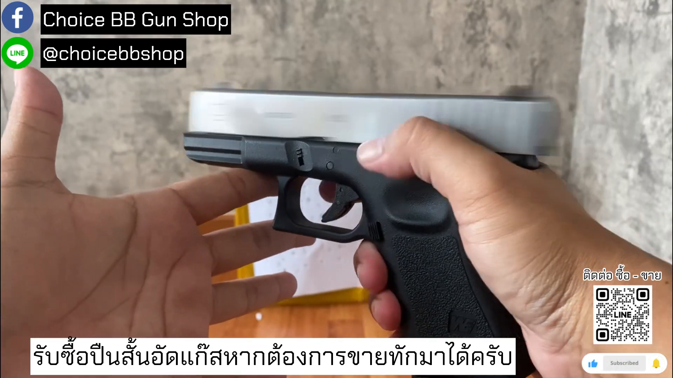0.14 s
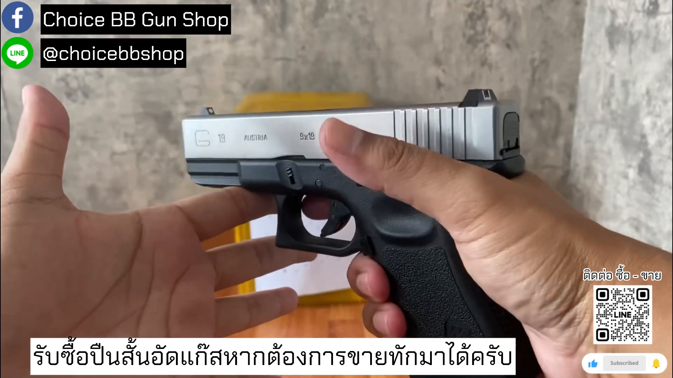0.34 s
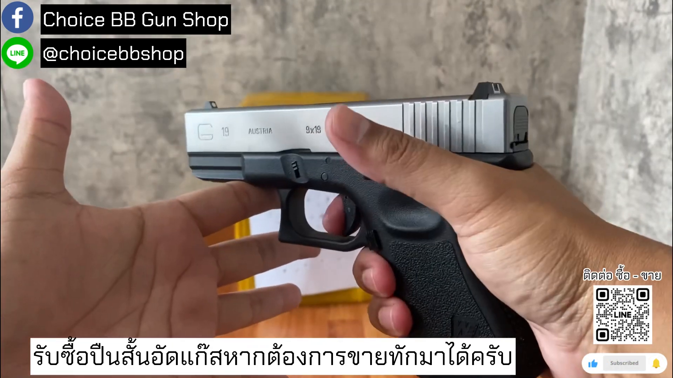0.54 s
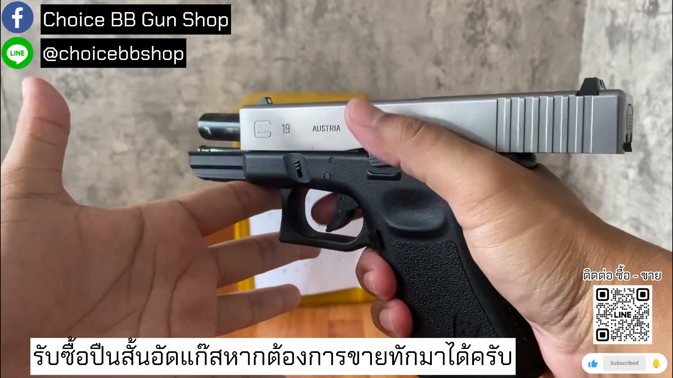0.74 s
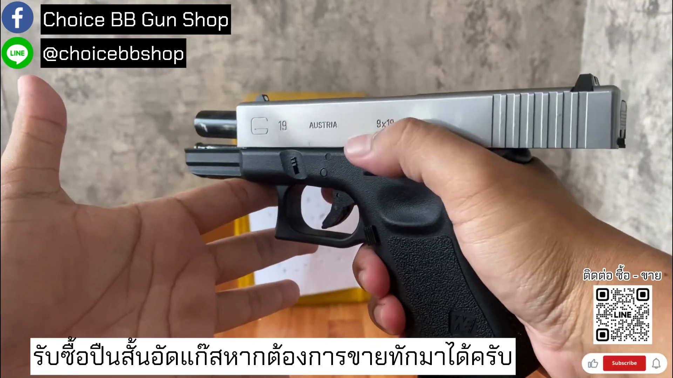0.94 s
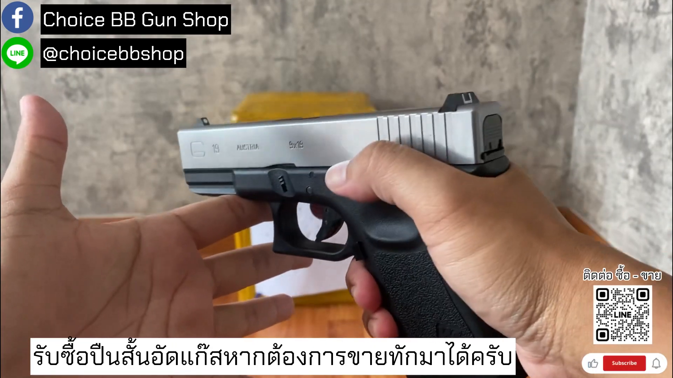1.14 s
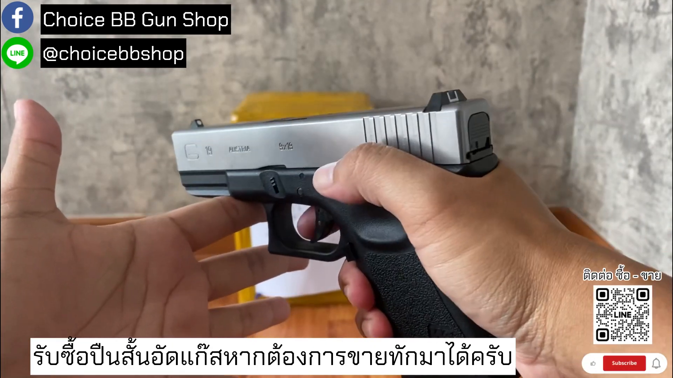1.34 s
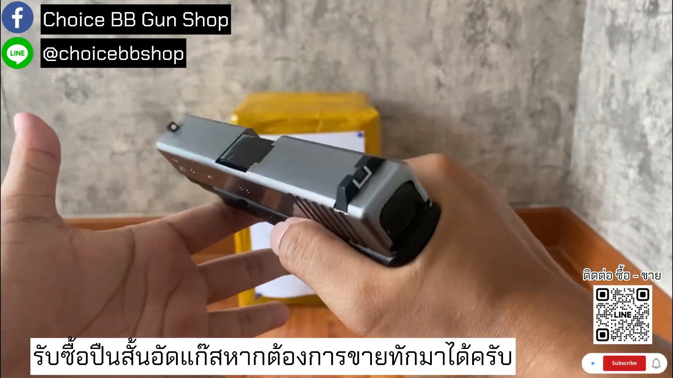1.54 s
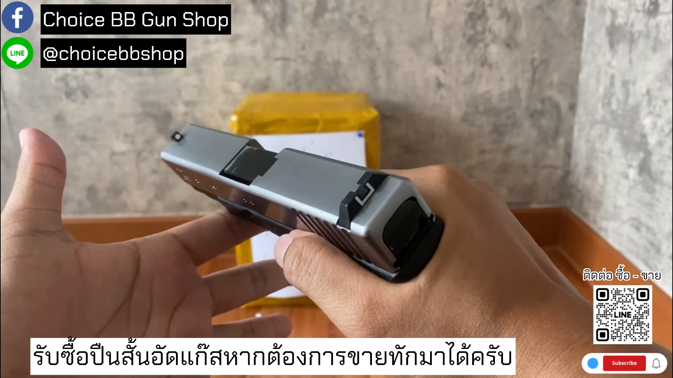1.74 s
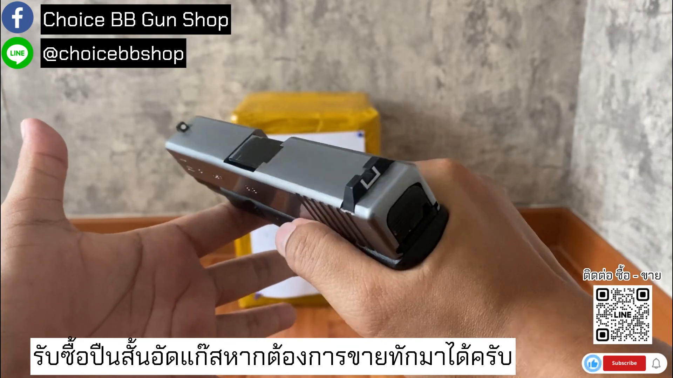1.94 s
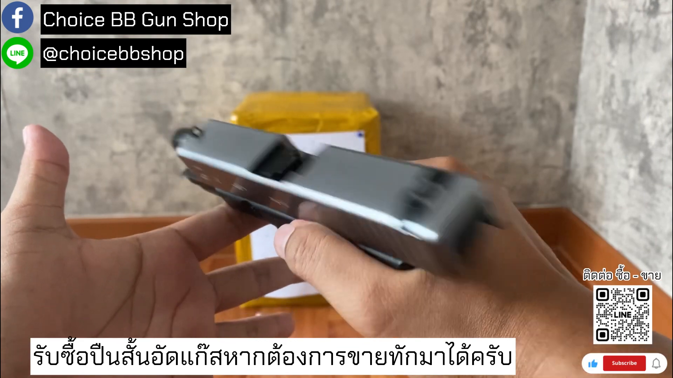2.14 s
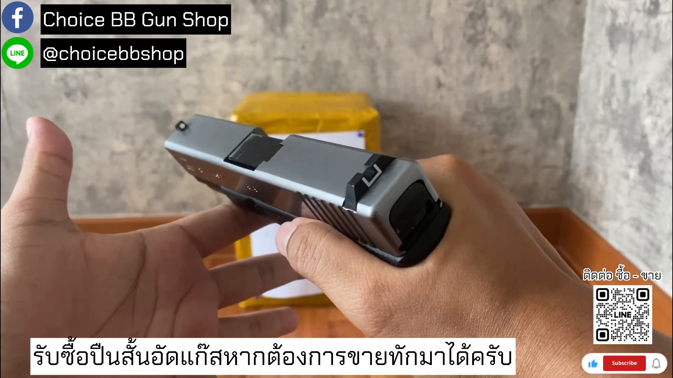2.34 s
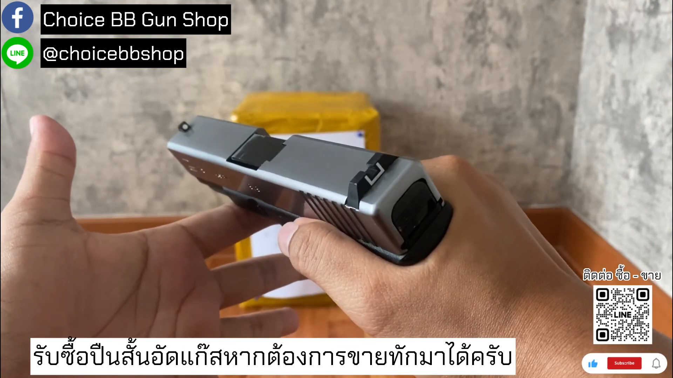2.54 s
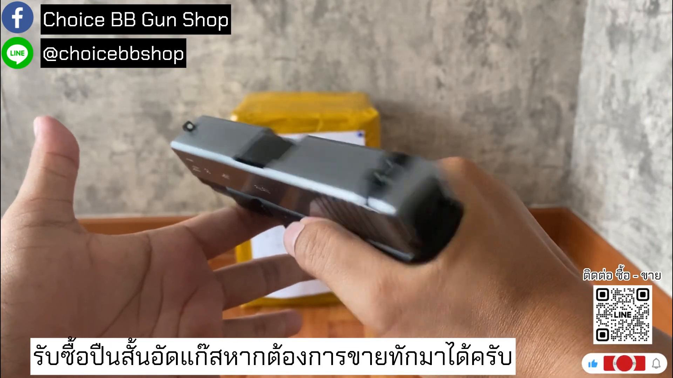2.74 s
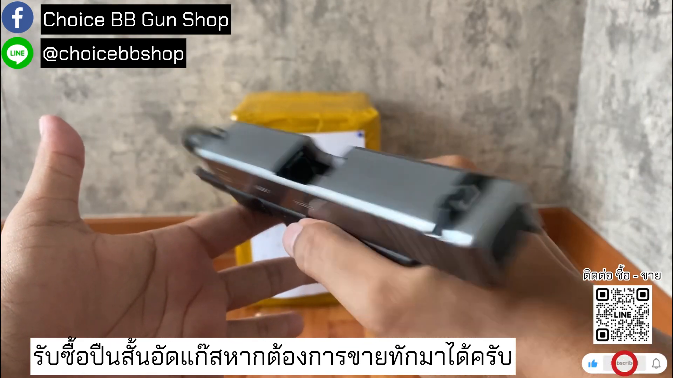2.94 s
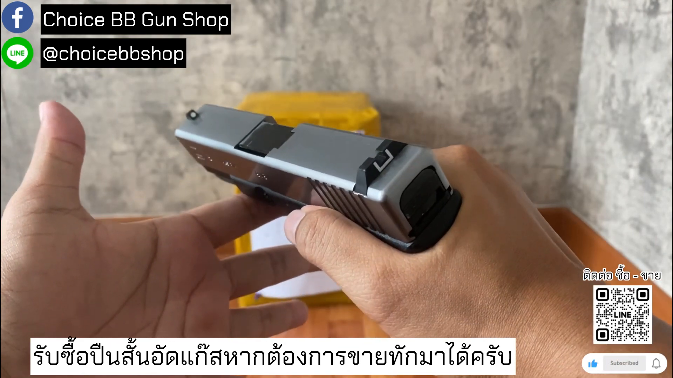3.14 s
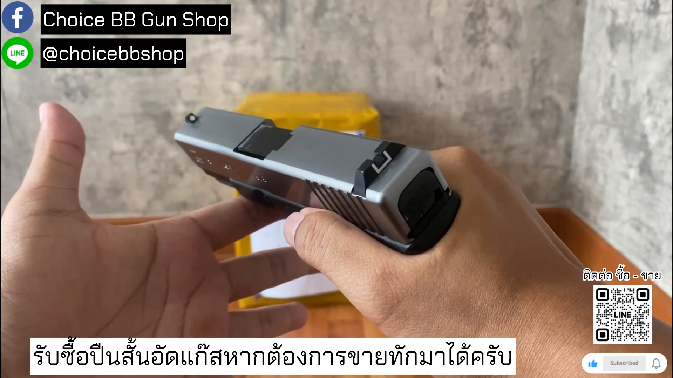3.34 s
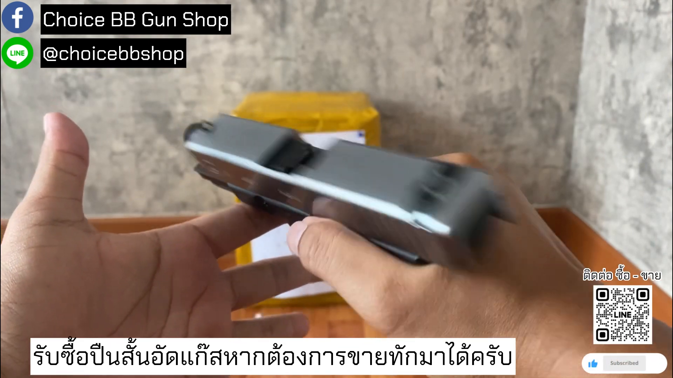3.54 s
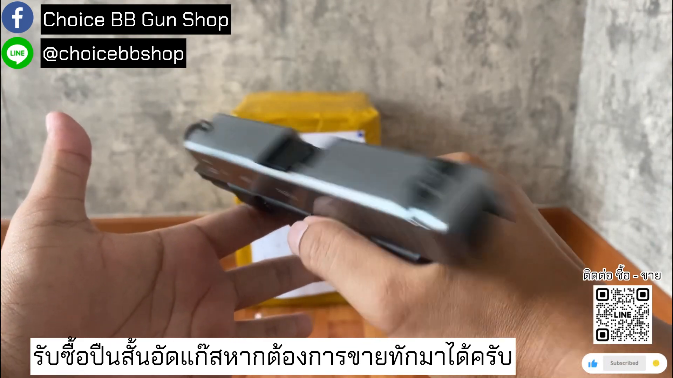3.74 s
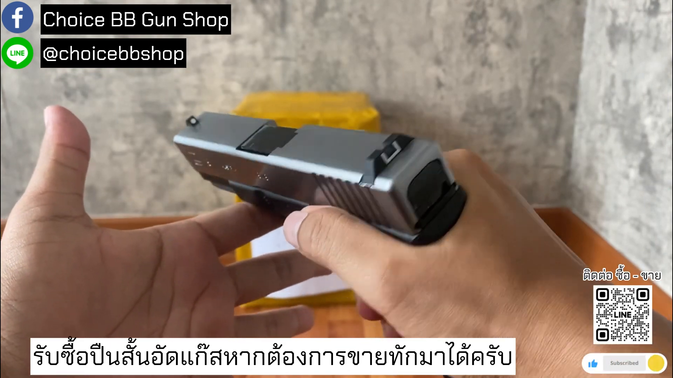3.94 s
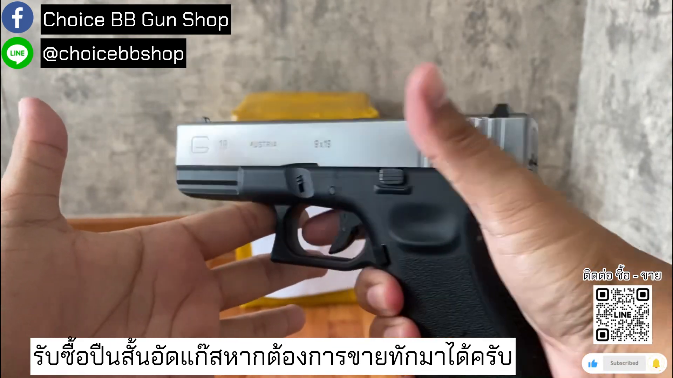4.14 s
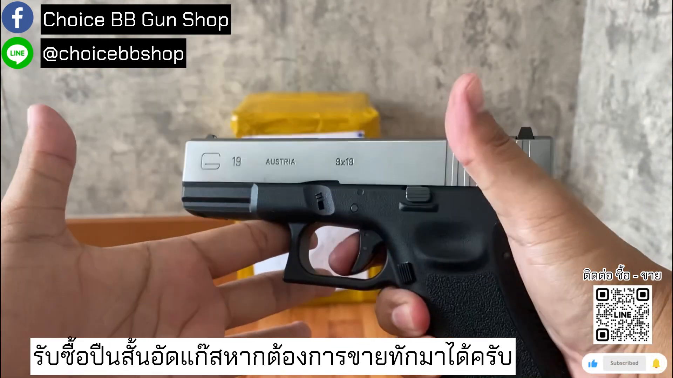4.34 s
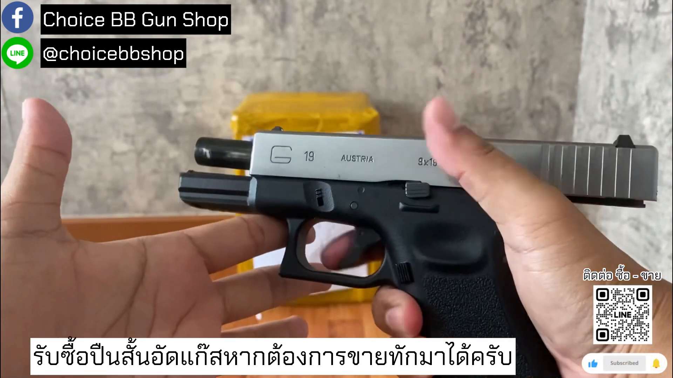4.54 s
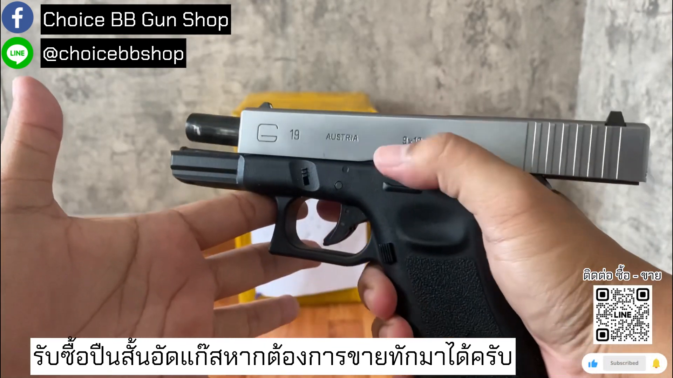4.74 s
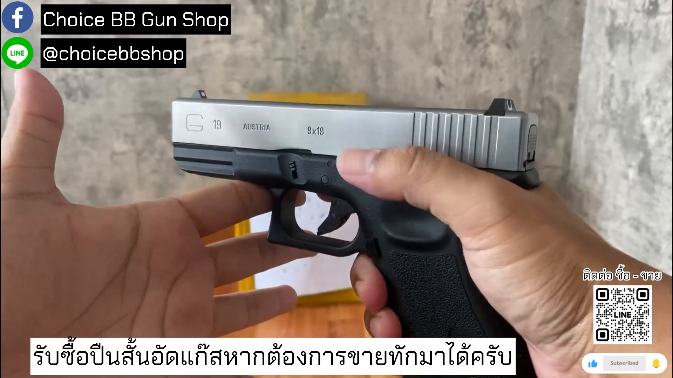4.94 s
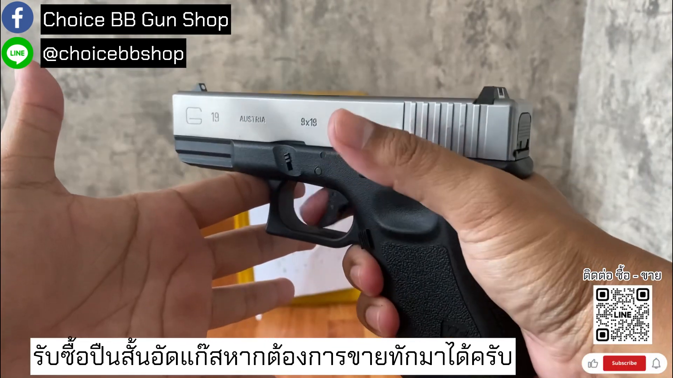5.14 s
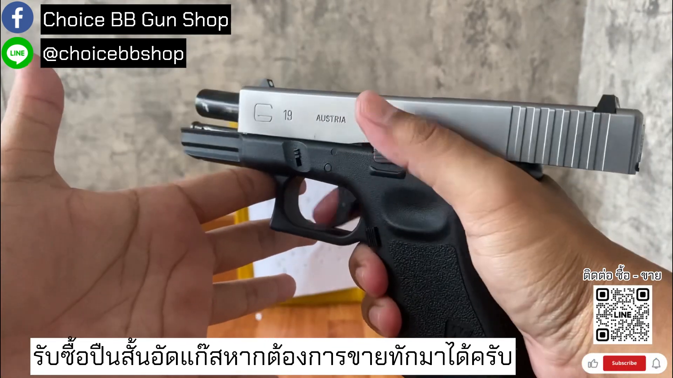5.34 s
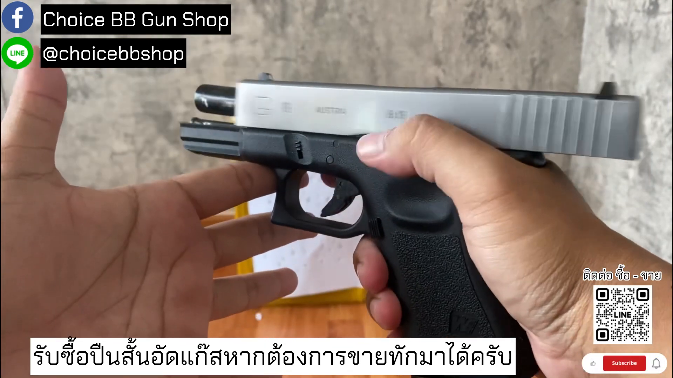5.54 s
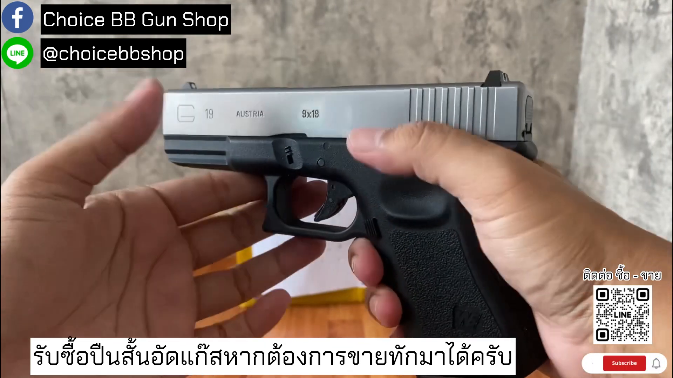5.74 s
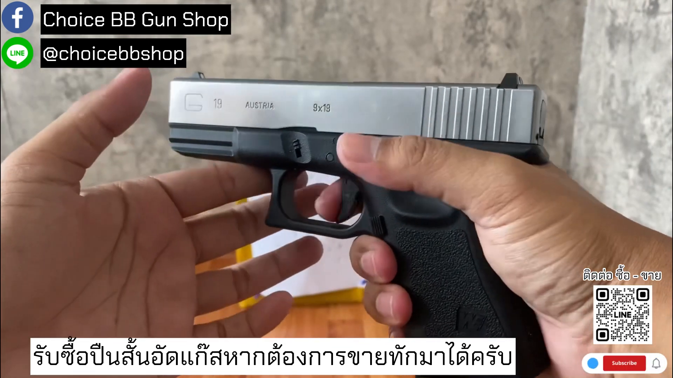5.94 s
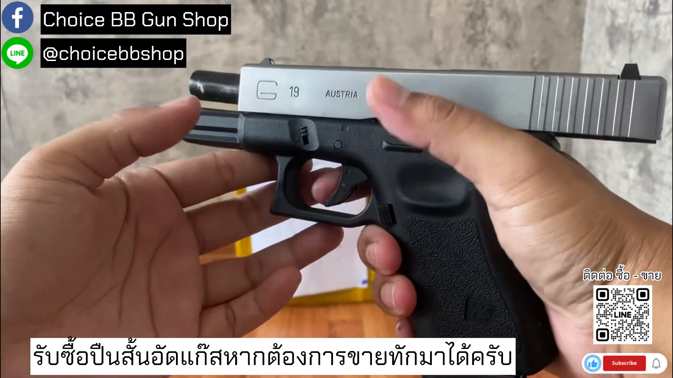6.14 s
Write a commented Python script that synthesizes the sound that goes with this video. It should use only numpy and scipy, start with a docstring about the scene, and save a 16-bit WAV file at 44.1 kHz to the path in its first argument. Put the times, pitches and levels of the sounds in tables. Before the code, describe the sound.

A gas airsoft pistol is fired empty repeatedly up close, each sharp popping hiss followed by steel slide clacks, faint spring hum and hard-room echo.

```python
"""Small hard room: a gas airsoft pistol is worked and fired empty close to a pair of microphones.
A shot is the hiss of sear and hammer, two jets of gas with pitched puffs, and steel on the rear stop.
The slide slams home with one bounce, or locks back until the thumb frees it: filtered noise rings the metal.
Decaying sines are the springs' hum; slow lumpy noise is stirred air buffeting the microphones."""
import sys
import numpy as np
from scipy import signal
from scipy.fft import rfft, irfft
from scipy.io import wavfile
from scipy.ndimage import uniform_filter1d, minimum_filter1d

SR = 44100
rng = np.random.default_rng(int(sys.argv[2]) if len(sys.argv) > 2 else 0)


def file_out(sig):
    """Save sig as 16-bit WAV at sys.argv[1]."""
    # one column per channel
    cols = np.atleast_2d(sig).T
    # limit, then scale
    lim = np.clip(cols, -1, 1)
    pcm = np.round(lim * 32767).astype(np.int16)
    wavfile.write(sys.argv[1], SR, pcm)


N = 272979

# Shots: hammer_s, rear_stop_db, puff_pitch_factor, air_wake_db
SHOTS = [(0.5737, -7.5, 1, -43), (1.8786, -8, 0.97, -49.5), (2.1157, -16.5, 0.97, -48), (2.702, -7, 1, -45),
         (2.9305, -11, 0.92, -48.5), (3.5188, -9, 1.004, -46.5), (3.7175, -19, 0.95, -39),
         (4.414, -6, 1, -41), (5.2079, 1.5, 1.005, -40.5), (5.9871, -1, 1.016, -40.5)]
# Slide slamming home: start_s, level_db, frame_clack_db, barrel_clink_db, jolt_db
SLAMS = [(0.1553, -6, -0.5, -16.5, -33.5), (1.0036, -5.5, -1.5, -9, -22.5), (1.9310, -2.5, -9.5, -1.5, -26),
         (2.175, -7.5, 0, -3, -33.5), (2.7510, -2, -4, -1, -21), (2.98, -0.5, -16, -5, -27.5),
         (3.569, -1.5, -17, -6, -22), (3.7667, -0.5, -21.5, -3, -20), (4.8442, -6.5, -0.5, -9.5, -22.5),
         (5.5860, -6, -7.5, -9.5, -23.5)]
# Small clicks of trigger and grip: start_s, level_db, brightness_db
CLICKS = [(0.4397, -34, 3), (0.5312, -40, -6), (1.3924, -34, 2), (1.6471, -57, -16.5), (1.7693, -46, -2),
          (3.9977, -42.5, 9), (5.162, -31.5, -2.5), (5.9328, -29, -3)]
# Thumb frees the locked slide: start_s, level_db
CATCH_RELEASES = [(0.1227, -20), (0.9672, -18.5), (4.8108, -19.5), (5.5537, -17.5)]
# Hands fanning the microphones: peak_s, level_db, slope_db_per_s
HAND_SWEEPS = [(.89, -36, 56), (3.47, -49.5, 82), (4.94, -51.5, 93), (5.739, -37, 73)]

# Hiss of sear, hammer, two gas jets: after_hammer_s, relative_level_db, rise_s, fall_s
SHOT_HISS = [(-.018, -38, 0.006, 0.011), (-.0055, -27, 0.0016, .005), (-.001, -2, .0014, 0.0063),
             (.0052, -4.5, .0025, 0.0073)]
# Puffs of valve, opening cylinder, recoil push: after_hammer_s, relative_level_db, base_pitch_hz, peak_s
GAS_PUFFS = [(0.003046, -0.5, 570, 0.00071), (0.00968, -1, 514, .0013), (0.0068, -16, 170, 0.0024)]

# Ringing of steel slide: pitch_hz, relative_level_db, t60_s
SLIDE_MODES = [(1304, -12.5, 0.081), (1449, -12.5, 0.021), (2060, -14.5, 0.16), (2156, -9, 0.03),
               (2710, -10.5, 0.12), (4280, -11.5, 0.13), (5400, -12.5, 0.13), (6220, -16, 0.064),
               (6860, -5.5, .04), (7420, -5, .04), (10370, -3.5, 0.026), (11180, -0.5, 0.02),
               (11520, 3, 0.022), (12500, 0.5, 0.018)]
# Barrel heard through the ejection port: pitch_hz, relative_level_db, t60_s
BARREL_MODES = [(4300, -1, 0.035), (4390, 0.5, 0.04), (4560, -1, 0.022), (4840, 2.5, 0.02),
                (5320, -6.5, 0.027), (6230, -1.5, 0.057), (6510, 0, 0.056)]
# Long ringing of springs: pitch_hz, relative_level_db, t60_s
SPRING_MODES = [(274.5, -11, 1.1), (339.1, 1, 1.25), (404, -1, .85), (1949, -28, 1.2), (2019, -19, .5),
                (3892, -32, 1.2), (4231, -18, .95), (4883, -19, .55), (6864, -31, .9)]

# Spectrum of gas jets: frequency_hz, relative_db_per_hz
GAS_SPECTRUM = [(60, -10), (200, -6), (600, 2.5), (800, 0), (1030, -4), (1500, 1.5), (2200, -1.5),
                (4000, 0.5), (7000, 0), (9500, -2), (12000, 0.5), (14500, -10.5), (16000, -14)]
# Spectrum of steel chatter: frequency_hz, relative_db_per_hz
STEEL_SPECTRUM = [(200, -31.5), (800, -17.5), (1500, -8), (3200, -4.5), (4400, 0), (7000, 5.5), (9000, 1),
                  (11400, 5.5), (13200, 3), (14500, -9), (16000, -8)]
# Spectrum of frame clack: frequency_hz, relative_db_per_hz
CLACK_SPECTRUM = [(150, -31.5), (600, -28), (1050, -9.5), (1400, 0), (2400, 0), (3500, -6.5), (6000, -4.5),
                  (14000, -26.5)]
# Spectrum of moving air: frequency_hz, relative_db_per_hz
WIND_SPECTRUM = [(15, -25), (30, -11.5), (48, -1), (80, 7.5), (120, -5.5), (200, -11), (300, -31.5),
                 (600, -50.5), (2000, -74)]
# Spectrum of quiet room: frequency_hz, relative_db_per_hz
FLOOR_SPECTRUM = [(20, -23), (45, -4.5), (75, -6), (150, -15.5), (400, -20.5), (900, -26), (3000, -35),
                  (15000, -45.5)]

# Room decay: frequency_hz, t60_s
ROOM_T60 = [(100, 0.58), (350, 0.3338), (700, 0.35), (1800, 0.44), (4500, 0.4435), (8000, 0.3739),
            (12000, 0.3232), (15500, 0.23)]
# Room echo spectrum: frequency_hz, level_db
ROOM_COLOUR = [(50, -6), (100, -1), (190, -10.5), (235, -14), (330, -7), (450, 0), (600, -18.5), (850, -10),
               (1500, -8), (5000, -12.5), (12000, -12), (15500, -8.5)]
# Channel likeness of direct noise: frequency_hz, likeness_0_to_1
NEAR_LIKENESS = [(100, .95), (400, 0.5), (1000, 0.96), (3000, 0.8), (6000, 0.5)]
# Channel likeness of echoes: frequency_hz, likeness_0_to_1
ROOM_LIKENESS = [(100, 0.93), (400, 1), (800, 0.098), (1800, 0.19), (3500, 0.9), (5500, 0.16)]
# Microphone balance: frequency_hz, left_minus_right_db
BALANCE = [(200, 0), (550, 0), (1200, 0.5), (3000, 2.5), (5500, 3), (6600, 1), (9000, -0.5)]
# Phase lead of left microphone: frequency_hz, lead_rad
LEFT_LEAD = [(350, 0.56), (700, 0.48), (1200, 1.3), (3000, 0.78), (4500, 0.68)]

SHOT_DB = -0.2  # same dose of gas every shot
REAR_STOP_DELAY_S, REAR_STOP_FALL_S = 0.02, 0.002
REBOUND_DELAY_S, REBOUND_DB = 0.008, -11.5
# knocks along the rails as the freed slide runs forward
RAIL_KNOCKS, RAIL_GAP_S, RAIL_DB, RAIL_BRIGHT_DB = 2, 0.01, -10, 5
CLICK_RISE_S, STEEL_FALL_S, FRAME_FALL_S = 0.001, 0.0035, 0.006
WAKE_RISE_S, WAKE_FALL_DB_PER_S, STILL_AIR_DB = 0.1, 63.5, -70.5
ECHO_PATTERNS = 3
BAND_LIMIT_HZ = 16000


def gain_of(db):
    """Amplitude factor of a level in dB."""
    return 10 ** (np.asarray(db) / 20)


def evened(x):
    """Signal scaled to unit RMS."""
    return x / np.sqrt(np.mean(x ** 2) + 1e-20)


def read(points, hz):
    """Table of (frequency_hz, value), joined on a log-frequency axis."""
    f, value = np.transpose(points)
    return np.interp(np.log(hz + 1), np.log(f + 1), value)


def add(mix, start_s, sound):
    """Add a sound in place, cut at the end of the mix."""
    part = mix[..., round(start_s * SR):][..., :sound.shape[-1]]
    part += sound[..., :part.shape[-1]]


def convolve(x, response):
    """Convolve each channel, cut to N samples."""
    return signal.fftconvolve(np.atleast_2d(x), np.atleast_2d(response), axes=1)[:, :N]


def colour(x, spectrum, size=2048):
    """Causal minimum-phase filter of unit energy with the given spectrum."""
    hz = abs(np.fft.fftfreq(size, 1 / SR))
    log_gain = np.log(gain_of(read(spectrum, hz)))
    min_phase = np.exp(np.conj(signal.hilbert(log_gain)))
    response = np.fft.ifft(min_phase).real[:size // 2]
    return convolve(x, response / np.linalg.norm(response))


def pair(x, likeness):
    """Make two unrelated channels as alike as the table says."""
    a, b = rfft(x)
    same = np.clip(read(likeness, np.fft.rfftfreq(x.shape[1], 1 / SR)), 0, 1)
    return irfft(np.array([a, same * a + np.sqrt(1 - same ** 2) * b]), x.shape[1])


def noise():
    """White noise, partly shared by both channels."""
    return pair(rng.standard_normal((2, N)), NEAR_LIKENESS)


def burst(rise_s, fall_s):
    """Envelope of one contact or jet: linear rise, exponential fall."""
    t = np.arange(SR // 8) / SR
    return np.minimum(t / rise_s, 1) * np.exp(-np.maximum(t - rise_s, 0) / fall_s)


def ring(modes):
    """Response of a struck body: a sum of dying sines."""
    t = np.arange(2 * SR) / SR
    return sum(gain_of(db - 60 * t / t60_s) * np.sin(2 * np.pi * hz * t) for hz, db, t60_s in modes)


def puff(hz, peak_s, sag_s):
    """A few swings of air pressure; the pitch has halved after sag_s."""
    t = np.arange(SR // 10) / SR
    turns = hz * sag_s * np.log1p(t / sag_s)
    swell = t / peak_s * np.exp(1 - t / peak_s)
    return swell * np.sin(2 * np.pi * turns)


def recoil(shot_spring_db=-1, slam_spring_db=-22, earlier_shot_s=0.85):
    """Shots and slams set the springs humming; each slam adds a thud of sagging pitch."""
    out = np.zeros(N)
    spring = gain_of(-36) * ring(SPRING_MODES)
    add(out, 0, spring[round(earlier_shot_s * SR):])  # still humming from a shot just before
    for hammer_s, *_ in SHOTS:
        add(out, hammer_s + 0.01, gain_of(shot_spring_db) * spring)
    for start_s, db, *_, jolt_db in SLAMS:
        add(out, start_s, gain_of(jolt_db) * puff(hz=950, peak_s=0.0036, sag_s=0.0014))
        add(out, start_s, gain_of(db + slam_spring_db) * spring)
    return out


def draught():
    """Strength of moving air: shot wakes swell, then die; they and the hand sweeps add in power."""
    t = np.arange(N) / SR
    power = gain_of(STILL_AIR_DB) ** 2
    for hammer_s, *_, db in SHOTS:
        rise = np.clip((t - hammer_s) / WAKE_RISE_S, 0, 1)
        falling_s = np.maximum(t - hammer_s - WAKE_RISE_S, 0)
        wake = rise * gain_of(db - WAKE_FALL_DB_PER_S * falling_s)
        power = power + wake ** 2
    for peak_s, db, slope_db_per_s in HAND_SWEEPS:
        sweep = gain_of(db - slope_db_per_s * abs(t - peak_s))
        power = power + sweep ** 2
    return np.sqrt(power)


def air(floor_db=-76, lumps_db=3):
    """Lumpy gusts on the microphones over the quiet of the room."""
    lumps = evened(signal.oaconvolve(rng.standard_normal(N), signal.windows.hann(SR // 25), "same"))
    gusts = draught() * gain_of(lumps_db * lumps) * colour(noise(), WIND_SPECTRUM)
    quiet = gain_of(floor_db) * colour(noise(), FLOOR_SPECTRUM)
    return gusts + quiet


def light_contacts(catch_bright_db=-1.2):
    """Rows of start_s, level_db, brightness_db: clicks, catch snaps and evenly spaced rail knocks."""
    rows = list(CLICKS)
    for start_s, db in CATCH_RELEASES:
        rows.append((start_s, db, catch_bright_db))
        for k in range(1, RAIL_KNOCKS + 1):
            rows.append((start_s + k * RAIL_GAP_S, db + RAIL_DB, RAIL_BRIGHT_DB))
    return rows


def struck(drive, modes):
    """A body of unit energy rung by the drive."""
    response = ring(modes)
    return convolve(drive, response / np.linalg.norm(response))


def metal(ring_db=-7, clack_db=-7, click_clack_db=-5, grain_db=1.5):
    """Steel chatters for a few ms at each contact; slide and barrel ring, the frame clacks."""
    steel, frame, barrel = np.zeros((3, N))
    for hammer_s, stop_db, *_ in SHOTS:
        add(steel, hammer_s + REAR_STOP_DELAY_S, gain_of(stop_db) * burst(0.0006, REAR_STOP_FALL_S))
    for start_s, db, frame_db, barrel_db, _ in SLAMS:
        slam = gain_of(db) * burst(0.00047, 0.0042)
        rebound = gain_of(db + REBOUND_DB) * burst(0.0003, 0.0047)
        for at_s, blow in (start_s, slam), (start_s + REBOUND_DELAY_S, rebound):
            add(steel, at_s, blow)
            add(frame, at_s, gain_of(clack_db + frame_db) * blow)
            add(barrel, at_s, gain_of(barrel_db) * blow)
    for start_s, db, bright_db in light_contacts():
        add(steel, start_s, gain_of(db + bright_db) * burst(CLICK_RISE_S, STEEL_FALL_S))
        add(frame, start_s, gain_of(db + click_clack_db) * burst(CLICK_RISE_S, FRAME_FALL_S))
    roughness = evened(uniform_filter1d(rng.standard_normal(N), size=16))
    grain = evened(gain_of(grain_db * roughness))
    chatter = steel * grain * noise()
    slide_ring = gain_of(ring_db) * struck(chatter, SLIDE_MODES)
    barrel_ring = struck(barrel * noise(), BARREL_MODES)
    clack = colour(frame * noise(), CLACK_SPECTRUM)
    return colour(chatter, STEEL_SPECTRUM) + slide_ring + barrel_ring + clack


def room(x, first_echo_s=0.0037, build_up_s=0.0042):
    """Dense echoes from near walls, each band dying at its own speed."""
    hz, t, z = signal.stft(pair(rng.standard_normal((2, SR)), ROOM_LIKENESS), SR, nperseg=256)
    t60_s = read(ROOM_T60, hz)[:, None]
    decay = gain_of(read(ROOM_COLOUR, hz)[:, None] - 60 * t / t60_s)
    even_energy = np.sqrt(2 * np.log(1000) / (t60_s * SR))
    tail = signal.istft(z * decay * even_energy, SR, nperseg=256)[1][:, :SR]
    onset = np.clip((np.arange(SR) / SR - first_echo_s) / build_up_s, 0, 1)
    return convolve(x.mean(0) * np.sqrt(2), tail * onset)


def gas():
    """Jets hiss in stages; each puff thumps with a pitch that sags as the pressure drops."""
    jet, thump = np.zeros((2, N))
    for hammer_s, _, pitch_factor, _ in SHOTS:
        for after_s, db, rise_s, fall_s in SHOT_HISS:
            add(jet, hammer_s + after_s, gain_of(db) * burst(rise_s, fall_s))
        for after_s, db, base_hz, peak_s in GAS_PUFFS:
            hz = base_hz * pitch_factor * rng.uniform(0.96, 1.02)
            add(thump, hammer_s + after_s, gain_of(db) * puff(hz, peak_s, sag_s=0.0082))
    return gain_of(SHOT_DB) * (colour(jet * noise(), GAS_SPECTRUM) + thump)


def scene():
    """Pistol and its echoes, spring hum and thuds, moving air."""
    pistol = gas() + metal()
    # the pistol moves, so the echo pattern changes just ahead of each shot
    move_s = [shot[0] - 0.05 for shot in SHOTS]
    place = np.searchsorted(move_s, np.arange(N) / SR) % ECHO_PATTERNS
    echoes = sum(room(pistol * (place == k)) for k in range(ECHO_PATTERNS))
    return pistol + echoes + recoil() + air()


def microphones(x, split_hz=6300, aligned_hz=7050, lag_s=0.00025):
    """Left leads in the middle range; in the top treble both carry one signal, the left one late."""
    hz, (left, right) = np.fft.rfftfreq(N, 1 / SR), rfft(x)
    share = np.clip((hz - split_hz) / 400 + 0.5, 0, 1)
    shifted = left * np.exp(2j * np.pi * (hz - aligned_hz) * lag_s)
    delayed = right * np.exp(-1j * read(LEFT_LEAD, hz))
    right = (1 - share) * delayed + share * shifted
    lean = gain_of(read(BALANCE, hz) / 2)
    return irfft(np.array([left * lean, right / lean]), N)


def limiter(x, threshold_db=-7, hold_s=0.1, recovery_db_per_s=75):
    """Gain drops at once on a loud blow, holds, then recovers at a steady dB rate."""
    power = abs(uniform_filter1d((x ** 2).mean(0), size=128))
    level_db = 10 * np.log10(power + 1e-12)
    half = int(hold_s * SR / 2)
    excess_db = np.maximum(level_db - threshold_db, 0)
    held_db = -minimum_filter1d(-excess_db, 2 * half + 1, origin=half)
    fall_db = recovery_db_per_s * np.arange(N) / SR
    cut_db = np.maximum.accumulate(held_db + fall_db) - fall_db
    return x / gain_of(uniform_filter1d(cut_db, size=64))


def record(dry, low_cut_hz=38):
    """Low cut, microphone pair, limiter, overload clipping and band limit."""
    low_cut = signal.butter(3, low_cut_hz, "high", fs=SR, output="sos")
    faded = signal.sosfilt(low_cut, dry) * signal.windows.tukey(N, 0.002)
    clipped = np.clip(limiter(microphones(faded)), -0.95, 0.95)
    band_limit = signal.firwin(511, BAND_LIMIT_HZ, window=("kaiser", 9), fs=SR)
    return signal.oaconvolve(clipped, band_limit[None], "same")


dry = scene()
out = record(dry)
file_out(out)
```